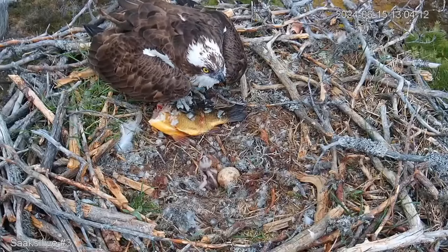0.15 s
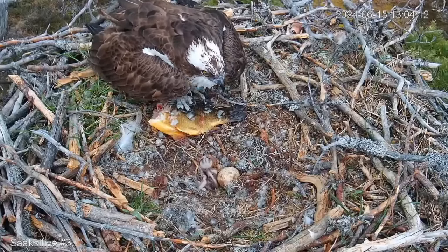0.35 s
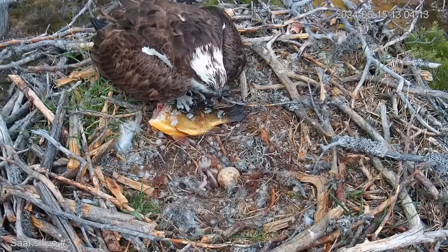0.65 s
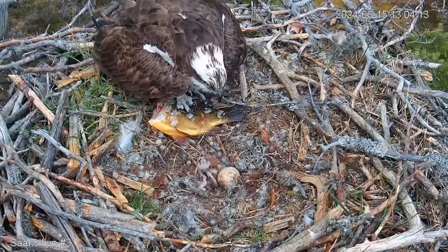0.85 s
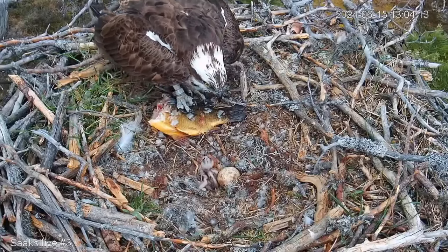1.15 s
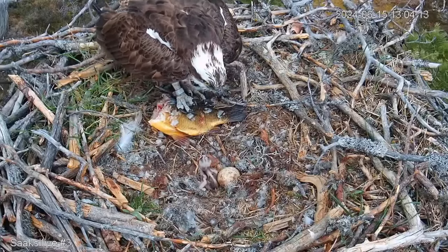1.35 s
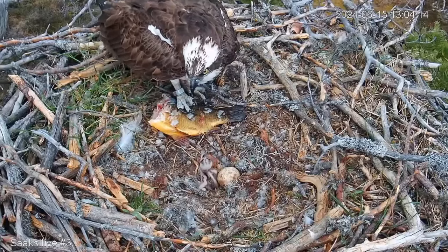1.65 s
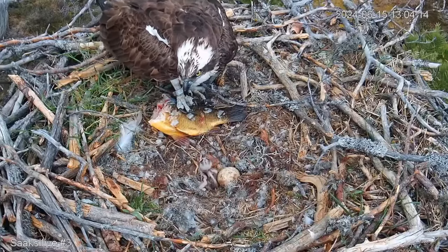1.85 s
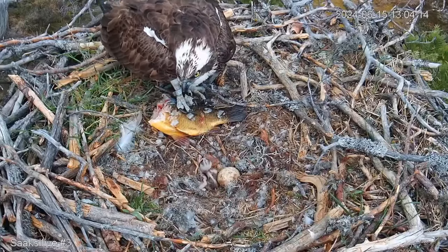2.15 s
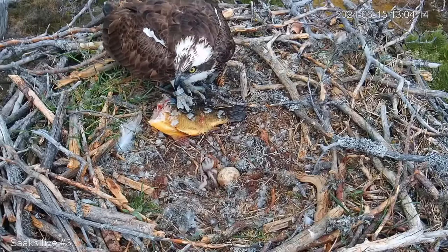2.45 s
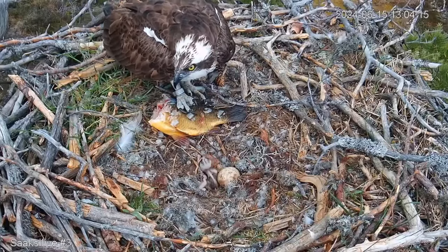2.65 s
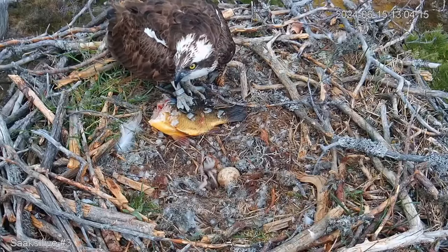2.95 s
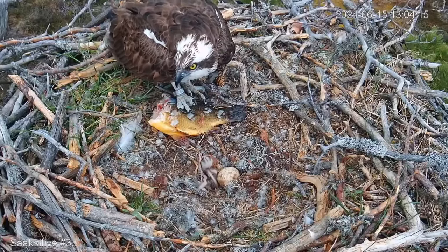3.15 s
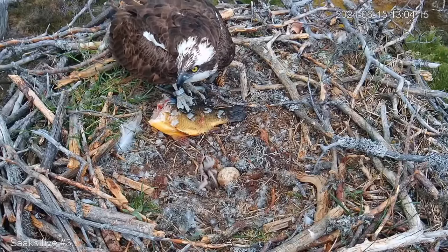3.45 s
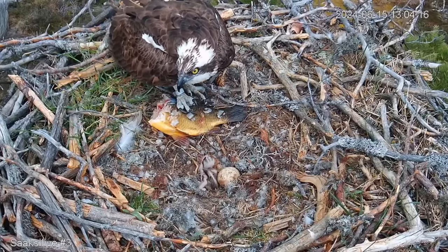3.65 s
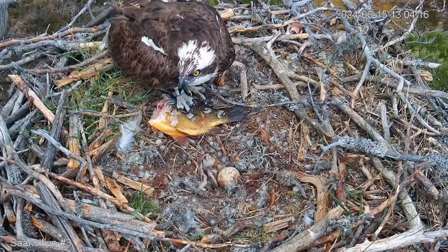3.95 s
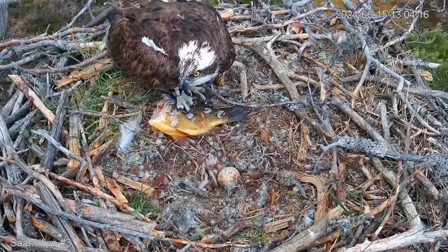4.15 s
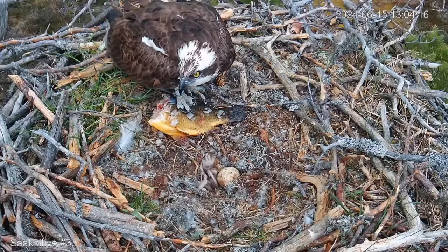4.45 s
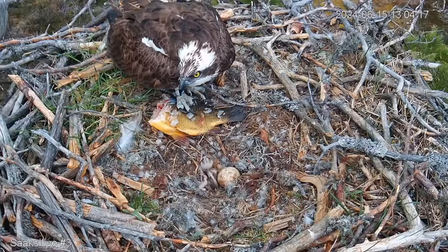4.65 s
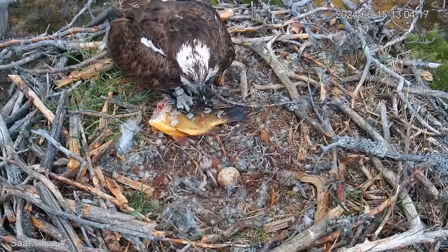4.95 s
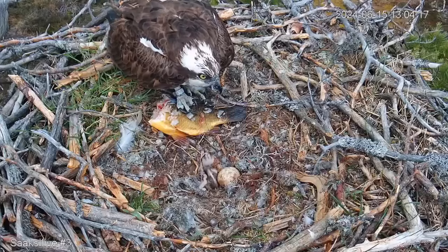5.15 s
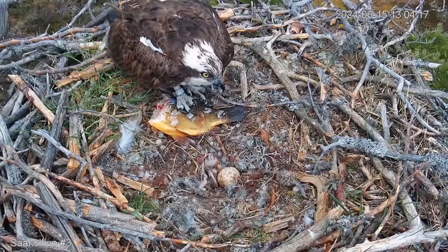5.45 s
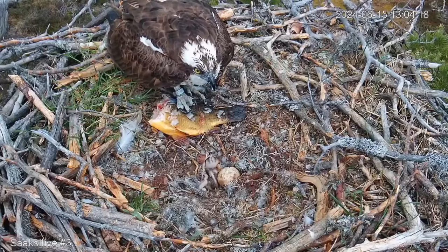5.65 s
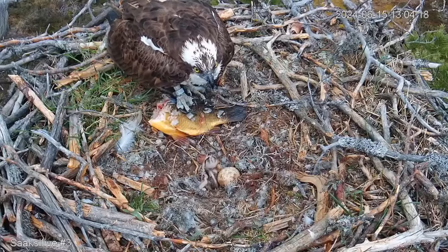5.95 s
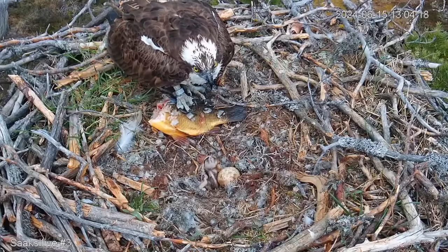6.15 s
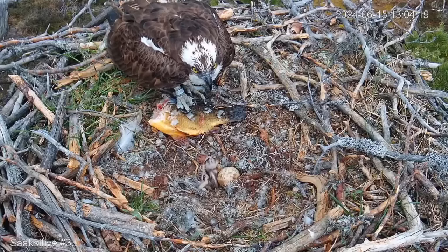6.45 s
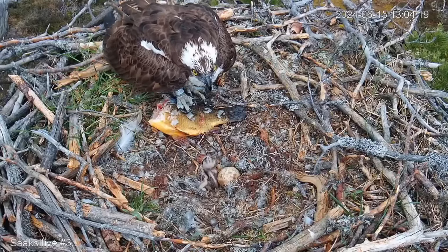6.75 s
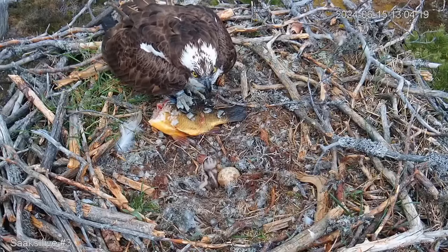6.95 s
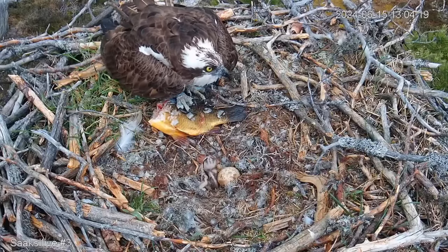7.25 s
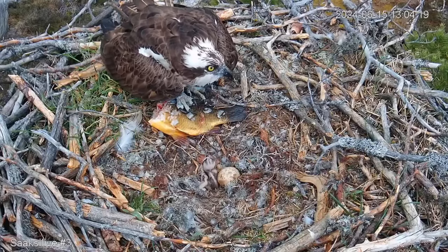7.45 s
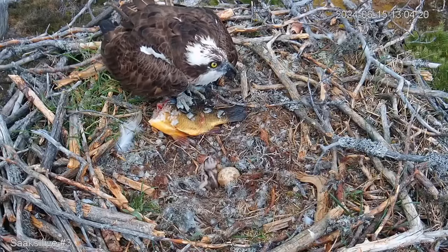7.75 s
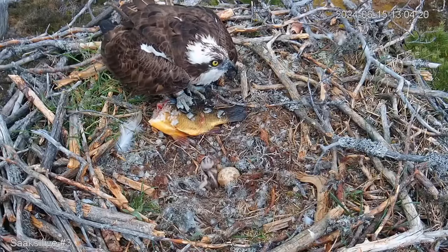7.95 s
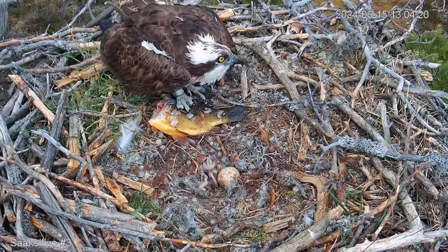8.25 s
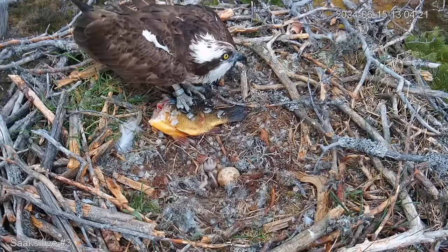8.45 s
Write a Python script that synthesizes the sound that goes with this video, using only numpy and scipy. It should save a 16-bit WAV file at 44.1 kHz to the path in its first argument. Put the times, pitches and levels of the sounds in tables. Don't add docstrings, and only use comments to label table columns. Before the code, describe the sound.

An osprey at its stick nest gives eight short, arched, partly raspy whistled calls over cracking twigs, faint far peeps, light wind and hiss.

```python
import sys
import numpy as np
from scipy import signal
from scipy.fft import rfft, irfft
from scipy.io import wavfile
from scipy.ndimage import uniform_filter1d

SR = 44100
rng = np.random.default_rng(int(sys.argv[2]) if len(sys.argv) > 2 else 0)


def dump_mix(stems):
    frames = np.atleast_2d(stems).T
    limited = np.clip(frames, -1, 1)
    pcm = np.round(limited * 32767).astype(np.int16)
    wavfile.write(sys.argv[1], SR, pcm)


def field_ratio(decibels):
    return 10 ** (np.asarray(decibels, dtype=float) / 20)


N = 378819

# (start [s], end [s], level [dB], drift to the end [dB], bare snap against ring [dB])
RASP_SPANS = [(0.0, 0.08, -38, 3, -6), (0.11, .168, -44, -9.5, -8.5), (0.227, 0.259, -36.5, 5, -8.5),
              (0.568, 0.789, -58.5, -7, 13), (1.268, 1.437, -52, -7, 5.5), (1.564, 1.597, -45, 1, -7),
              (1.91, 2.045, -39, -9.5, -11), (2.046, 2.087, -41, 3, -10), (2.247, 2.274, -42, 6, -20),
              (2.496, 2.636, -38, -4.5, -8.5), (2.792, 2.825, -38, 7, -13), (3.116, 3.306, -37.5, 1.5, -7),
              (3.381, 3.384, -43, 4, -12), (3.394, 3.43, -48, 4, -4), (3.44, 3.455, -41.5, 3, -26),
              (4.956, 5.206, -38.5, -12, -7.5), (5.676, 5.867, -38, -15, -10), (5.868, 5.891, -46.5, 1, -9),
              (5.974, 5.984, -54, 5, 0)]
# (rate at start [1/s], at end [1/s], unevenness [0-1], slip of the overtones [cycles])
SLAP_PACE = [(600, 650, .22, .075), (700, 700, .25, .1), (950, 950, .12, .07), (700, 750, .22, .125),
             (850, 650, .2, .1), (800, 800, .2, .07), (720, 600, .2, .065), (900, 1050, .1, .07),
             (900, 900, .15, .07), (800, 560, .2, .085), (800, 800, .2, .07), (800, 600, .2, .125),
             (800, 800, .2, .07), (950, 950, .15, .07), (800, 800, .2, .07), (620, 450, .15, .06),
             (850, 700, .2, .065), (860, 890, .06, .05), (800, 800, .2, .07)]
# (time [s], level [dB])
SQUEEZE_DB = [
    [(0.0, 0.5), (.03, -4), (.06, -9), (.092, -15.5), (.148, -8), (.204, 4.5), (.238, 2), (.269, 0)],
    [(.568, 5.5), (.6, -16), (.64, -16), (.7, -9), (.772, -11.5), (.798, -2.5), (.876, -1.5), (.911, -0.5)],
    [(1.269, 6), (1.311, -13), (1.35, -3), (1.411, -5), (1.461, -1), (1.529, -3), (1.58, 2.5),
     (1.606, -6.5)],
    [(1.911, -1), (1.971, 1.5), (2.01, -5.5), (2.045, -3), (2.095, -4.5), (2.173, 4.5), (2.211, 4),
     (2.275, -3)],
    [(2.496, -2.5), (2.55, 4.5), (2.62, -16), (2.654, -7.5), (2.726, -6), (2.764, 5), (2.81, 3)],
    [(3.117, -0.5), (3.209, -5), (3.243, -17), (3.29, -19), (3.31, -12), (3.347, -9), (3.389, -1),
     (3.44, 4)],
    [(4.957, 0), (5.0, -1), (5.06, -2.5), (5.16, -7.5), (5.223, -1), (5.285, -1), (5.33, 0), (5.35, -14),
     (5.374, -42)],
    [(5.677, 4), (5.707, 1), (5.785, -0.5), (5.883, -0.5), (5.953, 2), (5.999, 6.5), (6.018, 3.5)],
]


def colour(x, points, size=1024):
    hz, db = np.transpose(points)
    grid_hz = np.linspace(1, SR / 2, size + 1)
    cep = irfft(np.log(field_ratio(np.interp(np.log(grid_hz), np.log(hz), db))))
    cep[1:size] *= 2
    cep[size + 1:] = 0
    h = irfft(np.exp(rfft(cep)))[:size]
    return signal.fftconvolve(x, h / np.sqrt(np.sum(h ** 2)))[:len(x)]


def ring(x, hz, width_hz):
    return signal.lfilter(*signal.iirpeak(hz, hz / width_hz, SR), x)


def modes(x, table):
    click = np.arange(1024) == 0
    h = np.zeros(1024)
    for k, (hz, width_hz, db) in enumerate(table):
        h += (-1) ** k * field_ratio(db) * ring(click, hz, width_hz) / width_hz ** .5
    gain_db = 20 * np.log10(np.abs(rfft(h)) + 1e-5)
    return colour(x, np.transpose([np.linspace(1, SR / 2, 513), gain_db]))


def smooth(s, v, t):
    i = np.clip(np.searchsorted(s, t) - 1, 0, len(s) - 2)
    h, slope = np.diff(s)[i], np.gradient(v, s)
    u = np.clip((t - s[i]) / h, 0, 1)
    step = u * u * (3 - 2 * u) * (v[i + 1] - v[i])
    return v[i] + step + h * u * (1 - u) * ((1 - u) * slope[i] - u * slope[i + 1])


def gate(t, start, end, edge):
    return np.clip(np.minimum(t - start, end - t) / edge, 0, 1)


def arch(u, a, b, c):
    return a + (c - a) * u + (b - (a + c) / 2) * 4 * u * (1 - u)


def bumps(t, table):
    return sum(h * np.cos(np.pi / 2 * np.clip((t - s) / half, -1, 1)) ** 2 for s, half, h in table)


def walk(rate):
    k = int(SR / rate)
    held = np.repeat(rng.standard_normal(N // k + 1), k)
    return 1.3 * uniform_filter1d(uniform_filter1d(held, k), k)[:N]


def air(t):
    # (frequency [Hz], density [dB per Hz])
    hiss_colour = [(35, -73), (60, -32), (290, -19), (490, -12.5), (900, -5), (1400, -7), (2000, -2),
                   (3300, -3), (5300, -4.5), (8100, -4.5), (10300, -6), (11500, -11), (13700, -16.5)]
    # (frequency [Hz], density [dB per Hz])
    wind_colour = [(120, -42), (300, -19), (700, -7.5), (1200, -1), (2500, -2), (4500, -5.5), (9500, -6.5),
                   (12000, -22.5)]
    # (time [s], level [dB])
    gust_db = [
        (0.0, -68.5),
        (1.5, -75.5),
        (3.0, -67),
        (4.0, -64.5),
        (5.0, -68.5),
        (6.2, -63),
        (7.0, -63.5),
        (7.9, -65),
        (8.2, -62.5),
        (8.59, -57.5),
    ]
    hiss = field_ratio(-62.5 + .5 * walk(13)) * colour(rng.standard_normal(N), hiss_colour, size=2048)
    hiss += field_ratio(-86) * ring(rng.standard_normal(N), 40, 100)
    flicker_db = 1.2 * walk(25) + 1.5 * walk(300)
    wind = colour(rng.standard_normal(N) * field_ratio(flicker_db), wind_colour)
    return hiss + field_ratio(np.interp(t, *np.transpose(gust_db))) * wind


def peeps():
    # (time [s], length [s], level [dB], start pitch [Hz], end pitch [Hz])
    peep_notes = [(3.064, .043, -53, 5700, 5250), (7.428, .02, -66, 5400, 4900),
                  (7.553, .027, -59, 5100, 4500), (7.582, .012, -66, 5200, 6000),
                  (7.658, .022, -57, 4700, 4900), (7.687, .012, -64, 5200, 6000),
                  (7.766, .022, -57.5, 5150, 4700), (7.792, .012, -64, 5200, 6300),
                  (7.933, .058, -57.5, 5600, 4600), (8.098, .055, -56.5, 5600, 4650),
                  (8.258, .065, -58, 5600, 4650), (8.423, .042, -60, 5600, 4900)]
    low_hz, hook_hz = 5200, 5440
    out = np.zeros(N + SR)
    for s, length, db, first_hz, last_hz in peep_notes:
        middle_hz = hook_hz if first_hz < low_hz else (first_hz + last_hz) / 2
        u = np.linspace(0, 1, int(length * SR))
        cycles = np.cumsum(arch(u, first_hz, middle_hz, last_hz)) / SR
        note = field_ratio(db) * np.sin(np.pi * u) ** .5 * np.sin(2 * np.pi * cycles)
        note = note * field_ratio(2.5 * walk(250)[:len(u)])
        for lag_s, share in ((0, 1), (.004, .3), (.017, .1)):
            out[int((s + lag_s) * SR):][:len(u)] += share * note
    return out[:N]


def rustles(t):
    # (time [s], length [s], level [dB], ring [Hz])
    scrapes = [(1.222, 0.062, -65, 6000), (2.841, 0.022, -59, 4700), (2.994, 0.043, -62.5, 6700),
               (4.185, 0.024, -63, 5570), (4.565, 0.043, -61, 4500), (4.823, 0.023, -60.5, 4600),
               (6.188, 0.038, -62, 4400), (6.191, 0.036, -61, 5500), (6.274, 0.027, -60, 4600),
               (6.541, 0.014, -63, 3400), (6.802, 0.026, -63, 5200), (6.859, 0.025, -65, 4600),
               (7.144, 0.045, -61.5, 7400), (7.507, 0.022, -65, 4650), (7.525, .018, -62, 5600)]
    out = np.zeros(N)
    for s, length, db, low_hz in scrapes:
        on = slice(int(s * SR), int((s + length) * SR))
        grit = rng.standard_normal(SR // 8)[:len(t[on])] * field_ratio(4.0 * walk(500)[on])
        scrape = ring(ring(grit, low_hz, 900), low_hz, 900) + 0.51 * ring(grit, 8200, 1600)
        out[on] += field_ratio(db) * gate(t[on], s, s + length, 0.0025) * scrape / scrape.std()
    return out


def twigs():
    # (time [s], peak [dB], ring [Hz], ring against crack [dB])
    cracks = [(0.324, -32.5, 2340, -4), (0.3577, -48, 5500, -1), (0.4, -44, 6040, -11),
              (0.438, -44, 7240, 1), (0.472, -46, 7810, -3), (0.5498, -48, 7440, -3),
              (0.973, -38, 6560, -7), (3.674, -48, 7850, 0), (3.6964, -55, 5900, -3),
              (3.841, -47, 5960, -3), (3.8953, -47, 4900, -3), (3.933, -41, 4700, 1),
              (3.983, -44.5, 2090, -3), (4.409, -48, 2770, -3), (4.473, -41, 8700, 5),
              (4.571, -49, 4640, 1), (4.653, -47, 2100, -7), (5.533, -53, 6660, -3), (6.167, -44, 5280, 0),
              (6.276, -43.5, 4730, 9), (6.288, -49, 8000, 1), (6.293, -45, 4700, 1),
              (6.3563, -27.5, 7000, -7), (6.359, -36.5, 3600, 1), (6.3635, -42, 8000, -7),
              (6.457, -55, 9000, 1), (6.4764, -47.5, 8950, 6), (6.5418, -47, 6000, -6),
              (6.7288, -45, 3380, -2), (6.746, -42.5, 8000, -5), (6.764, -46, 6500, -6),
              (6.784, -29, 8300, -10), (6.7933, -42, 3700, -2), (6.7985, -45, 9000, -8),
              (6.8445, -47, 7900, -1), (6.871, -47, 4640, 2), (6.904, -48, 4700, 1),
              (7.0305, -45, 3300, -8), (7.883, -40.5, 4650, 3), (7.883, -45.5, 7600, 6),
              (7.89, -50, 7300, 3), (7.899, -49, 7300, 9), (8.3822, -44, 7460, -11)]
    out, t = np.zeros(N + SR), np.arange(SR // 8) / SR
    dull = signal.butter(2, 11500, fs=SR, output="sos")
    for s, db, hz, ring_db in cracks:
        t60_s = .018 * np.exp(.015 * (db + 56.0))
        grit = rng.standard_normal(len(t)) * field_ratio(1.7 * rng.standard_normal(len(t)))
        burst = grit * (field_ratio(-60 * t / (.2 * t60_s)) + .5 * field_ratio(-60 * t / t60_s))
        snap = ring(ring(burst, 6600, 7500), 6600, 7500) + .6 * ring(burst, 3400, 1200)
        snap = snap + 3.2 * field_ratio(ring_db) * ring(ring(burst, hz, 1100), hz, 1100)
        snap = snap + 0.054 * np.diff(burst, prepend=0) * field_ratio(-60 * t / 0.0037)
        snap = signal.sosfilt(dull, snap)
        out[int(s * SR):][:len(t)] += field_ratio(db) * snap / np.abs(snap).max()
    return out[:N]


def beating(t):
    # (start [s], end [s], beat at start [Hz], at end [Hz], depth [dB])
    beat_spans = [
        (5.221, 5.244, 330, 700, -3),
        (5.244, 5.263, 700, 930, -7),
        (5.263, 5.306, 930, 330, -12),
        (5.8937, 5.9172, 330, 320, -3),
        (5.9172, 5.9322, 320, 100, -3),
        (5.9322, 5.943, 60, 60, -6),
    ]
    # (1st partial [dB], 1st fade per step [0-1], 2nd fade [0-1], 3rd partial [dB])
    ladders = [(-1, .88, .6, -4), (1, .92, .68, -5), (4, .88, .55, -4), (-3, .88, .5, 2), (-3, .88, .5, 2),
               (-3, .85, .6, -3)]
    rate_hz, depth, fade = np.zeros(N), np.zeros((3, N)), np.zeros((3, N))
    for (start, end, first_hz, last_hz, db), ladder in zip(beat_spans, ladders):
        low_db, low_fade, mid_fade, top_db = ladder
        on = slice(int((start - .002) * SR), int(end * SR))
        middle_hz = (first_hz + last_hz) / 2 + 55
        rate_hz[on] = arch((t[on] - start) / (end - start), first_hz, middle_hz, last_hz)
        depth[:, on] = field_ratio(db + np.array([[low_db], [0], [top_db]]))
        fade[:, on] = np.clip([[low_fade], [mid_fade], [.4]], 0, .93)
    turns = np.cumsum(rate_hz * (1 + .015 * walk(150))) / SR
    turns = turns - np.maximum.accumulate(np.where(rate_hz == 0, turns, 0)) - .66
    depth, fade = uniform_filter1d(depth, size=100), uniform_filter1d(fade, size=100)
    return depth, fade, np.exp(2j * np.pi * turns)


def whistle(t):
    # (frequency [Hz], gain [dB])
    throat = [(1300, -17), (2000, -2), (2800, 0.05), (3300, -4.5), (3650, -10), (3900, -0.5), (4500, -1.5),
              (5300, 14), (5900, 12), (6600, 11), (7200, 7), (7700, 10), (9000, 9.5), (11500, -3)]
    # (pitch [Hz], 1st partial [dB], 2nd [dB], 3rd [dB])
    register = [(1410, -48.5, -53.5, -69.5), (2150, -51.5, -53, -60), (2410, -53.5, -51.5, -51.5),
                (2716, -48.5, -52, -52.5), (3210, -46.5, -56, -59), (3584, -42.5, -48, -52.5),
                (3700, -47, -46.5, -49.5), (3996, -39, -40.5, -52.5)]
    # (start [s], start pitch [Hz], end [s], end pitch [Hz])
    call_ends = [
        (0.0, 2682, .270, 1620),
        (.568, 1480, .911, 1450),
        (1.269, 1500, 1.606, 1760),
        (1.911, 1450, 2.285, 2180),
        (2.496, 1520, 2.83, 1530),
        (3.117, 1337, 3.466, 1584),
        (4.957, 1283, 5.374, 1650),
        (5.677, 2070, 6.018, 1540),
    ]
    # (time [s], pitch [Hz])
    glides = [
        [(.026, 2505), (.092, 3490), (.118, 3280), (.148, 3170), (.162, 3210), (.204, 3640), (.238, 2825)],
        [(.586, 2135), (.64, 2820), (.702, 2672), (.772, 3120), (.798, 3410), (.876, 3047), (.894, 2515)],
        [(1.311, 2897), (1.365, 2900), (1.411, 3015), (1.461, 3765), (1.491, 3660), (1.529, 3746),
         (1.591, 2455)],
        [(1.937, 2405), (1.971, 2870), (2.045, 2557), (2.095, 3480), (2.173, 3620), (2.211, 3892),
         (2.265, 2780)],
        [(2.51, 2100), (2.592, 3147), (2.654, 3530), (2.688, 3520), (2.726, 3583), (2.764, 3784), (2.81, 2554)],
        [(3.135, 2132), (3.209, 3000), (3.243, 2920), (3.305, 3350), (3.347, 3670), (3.389, 3230),
         (3.427, 2950)],
        [(4.987, 2200), (5.069, 2418), (5.147, 3106), (5.189, 3070), (5.223, 3450), (5.258, 3680),
         (5.318, 3480), (5.35, 2830)],
        [(5.707, 2586), (5.785, 2715), (5.831, 2950), (5.869, 3450), (5.883, 3540), (5.953, 3530),
         (5.999, 2503)],
    ]
    # (start [dB], middle [dB], end [dB], first push [dB])
    breath = [(-3, -1, 1, 1.1), (0.3, 0.5, 1, 3.8), (0, -1.5, 0, 6), (-1.8, 0, -0.5, 3.2), (1, 0, 3, 0.92),
              (-0.5, 0, 5, 2.4), (-1.3, -2.5, -7.5, 1.9), (1, -1.5, 6, 3.5)]
    beak_open_db = [-0.025, 0.65, 0.76, -1.7, -1.1, -0.8, -1.5, -0.29]
    # (start [s], end [s], rate [Hz], depth [0-1])
    stutters = [(1.512, 1.555, 1100, .45), (2.125, 2.158, 700, .3), (2.165, 2.235, 900, .1),
                (2.738, 2.782, 900, .12), (5.932, 5.945, 500, .4)]
    # (time [s], half width [s], level [dB])
    catches = [(.218, 0.0085, -2.5), (0.869, 0.0065, -12), (2.188, 0.01, 3.5), (2.207, 0.013, -1),
               (2.224, 0.0082, 5), (2.238, 0.0081, -2.5), (2.782, 0.0075, -13.5), (3.318, 0.0085, -12),
               (3.372, 0.0096, -15), (4.974, 0.0021, -6), (5.213, 0.0044, 10), (5.219, 0.0021, -20),
               (5.334, 0.0047, -8), (5.890, .003, 0), (5.9315, 0.0031, -10), (5.939, 0.0031, 5.5),
               (5.962, 0.024, -7), (5.995, 0.0052, -3)]
    # (time [s], half width [s], level [dB])
    wavers = [(.08, 0.013, 6), (.107, .01, 7), (.148, 0.018, -8), (.835, .03, -7), (.868, .008, 6),
              (1.49, 0.024, 4.5), (2.125, .025, 3), (2.6, 0.019, -6), (2.783, .01, 7), (3.315, .012, 9),
              (3.374, 0.01, 12), (3.4, 0.023, -4), (5.22, 0.036, -6), (5.31, 0.038, -8), (5.334, 0.0052, 3),
              (5.8, 0.08, 3), (5.89, 0.06, -6), (5.937, .005, -9)]
    # (time [s], half width [s], pitch shift [Hz])
    kinks = [(.19, .035, -70), (1.285, .018, 90), (1.57, .018, -60), (1.592, .01, 90), (2.105, .018, -50),
             (2.52, .012, 70), (2.55, .012, -90), (2.81, .014, 120), (3.14, .018, 60), (5.22, .007, 110),
             (5.29, .038, -160), (5.325, .015, 40)]
    push_at_s, push_width_s = 0.044, 0.036
    out, cycles = np.zeros(N), np.zeros(N)
    depth, fade, turn = beating(t)
    rasping = sum(gate(t, start, end, 0.0015) for start, end, *_ in RASP_SPANS)
    loss_db = -1.5 * sum(gate(t, start, end, 0.0052) for start, end, *_ in RASP_SPANS)
    register_hz, first_db, *overtone_db = np.transpose(register)
    throat_hz, throat_db = np.transpose(throat)
    stutter = np.ones(N)
    for start, end, hz, share in stutters:
        stutter += share * gate(t, start, end, 0.0054) * (np.tanh(walk(hz)) - .5)
    catch = field_ratio(sum(db * np.clip(1 - np.abs(t - s) / half, 0, 1) for s, half, db in catches))
    shaky_db, slip = 1.5 * rasping * np.tanh(walk(900)), np.tanh(walk(900))
    loose = sum(row[3] * gate(t, start, end, .003) for (start, end, *_), row in zip(RASP_SPANS, SLAP_PACE))
    calls = zip(call_ends, glides, breath, beak_open_db, SQUEEZE_DB)
    for ends, glide, (*breath_db, push_db), beak_db, grip in calls:
        s, hz = np.transpose([ends[:2], *glide, ends[2:]])
        on = slice(int(s[0] * SR), int(s[-1] * SR))
        pitch = smooth(s, hz, t[on]) + bumps(t[on], kinks)
        cycles[on] = np.cumsum(pitch) / SR
        squeeze = np.interp(t[on], *np.transpose(grip))
        push = push_db * np.exp(-((t[on] - s[0] - push_at_s) / push_width_s) ** 2)
        air_db = arch((t[on] - s[0]) / (s[-1] - s[0]), *breath_db) + push
        db = [np.interp(pitch, register_hz, first_db) + air_db + bumps(t[on], wavers)]
        db += [np.interp(pitch, register_hz, d) + squeeze for d in overtone_db]
        db[2] = db[2] + beak_db
        db += [db[2] - 4.5, db[2] - 8.5]
        for k, d in enumerate(db, 1):
            d = d + np.interp(np.log(k * pitch), np.log(throat_hz), throat_db)
            d = d - 7 * np.maximum(k * pitch / 1000 - 11.7, 0)
            d = d + (2.6 * shaky_db[on] + loss_db[on] if k > 1 else 1.6 * shaky_db[on])
            step = min(k, 3) - 1
            sidebands = depth[step, on] * turn[on] / (1 - fade[step, on] * turn[on])
            beat = (stutter[on] if k > 1 else 1) - sidebands
            slip_cycles = slip[on] * (loose[on] if k > 1 else .11 * rasping[on])
            phase = 2 * np.pi * k * (cycles[on] + slip_cycles)
            level = 2 ** .5 * field_ratio(d) * gate(t[on], s[0], s[-1], 0.00114)
            out[on] += level * np.imag(beat * np.exp(1j * phase))
    return out * catch, cycles


def rasp(t, cycles):
    # (frequency [Hz], width [Hz], level [dB])
    slap_modes = [(4500, 670, -10.5), (5114, 840, -7), (6010, 415, -1.5), (7420, 1070, -5),
                  (7570, 370, -1.5), (8500, 1050, -6), (10150, 170, -16), (10300, 1300, -27),
                  (12230, 2800, -15.5)]
    # (midway swell [dB], windpipe at start [dB], at end [dB], beak at start [dB], at end [dB])
    gapes = [(-1.6, 2, 8.5, 0.1, -6), (3.5, 2, 1, 0.1, -5), (-5.5, 2, -1, 0.1, 1),
             (0.3, -4.5, 10.5, 0.1, -8), (-0.6, 0, 11, 0.1, -2.5), (-7, -5, -2, 0.1, -3),
             (1.5, 1, 2, 0.1, 0.5), (.1, 6, 2, 1, -0.5), (-3, -8, -12, 0.1, 8.5), (-1.5, 0, 3.5, 1.1, 1.5),
             (-1.5, 9, 1, 0.1, -1), (-2, 8, 8.5, 0.1, -7), (2, 0.1, 0.1, 0.1, 2), (-4, 3, 6, 0.1, -3),
             (0, 1, 13, 0.1, -3), (-2.3, -5, 0, 1.3, 0), (-3.5, -3, 5, 0.1, -2), (0.5, 2, 2, 2, 2),
             (1, 2, 14, 0.1, -2)]
    taut_hz, slack_db_per_octave = 2770, -13
    lock_hz, lock_span_hz = 2150, 400
    slaps, snaps, pipe_db, beak_db = np.zeros((4, N))
    runs_db = 2.2 * np.tanh(walk(90))
    for span, (bow_db, *gape_db), (*pace, uneven, _) in zip(RASP_SPANS, gapes, SLAP_PACE):
        start, end, db, drift_db, snap_db = span
        chance = np.clip(rng.standard_normal((400, 3)).T, -2, 2)
        on = slice(int(start * SR), int(end * SR))
        pitch = np.clip(np.gradient(cycles[on]) * SR, 1000, 5000)
        rate = np.interp(t[on], (start, end), pace)
        rate = rate + (pitch - rate) * np.clip((lock_hz - pitch) / lock_span_hz, 0, 1)
        due = np.interp(np.cumsum(np.exp(uneven * chance[0])), np.cumsum(rate) / SR, t[on])
        cycle = np.round(np.interp(due, t[on], cycles[on]))
        wait = np.diff(cycle, prepend=cycle[0] - 2)
        kept = (wait > 0) & (due < t[on][-1])
        when = np.interp(cycle + .75 + .022 * chance[1], cycles[on], t[on])[kept]
        pitch = np.interp(when, t[on], pitch)
        u = (when - start) / (end - start)
        size = field_ratio(arch(u, db - drift_db / 2, db + bow_db, db + drift_db / 2))
        size = size * np.sqrt(SR * wait[kept] / pitch) * gate(when, start - .005, end + .003, .007)
        size = size * field_ratio(slack_db_per_octave * np.log2(taut_hz / np.minimum(pitch, taut_hz)))
        squeeze_db = 0.22 * np.interp(when, *np.concatenate(SQUEEZE_DB).T)
        size = size * field_ratio(squeeze_db + 1.1 * chance[2, kept] + np.interp(when, t, runs_db))
        for shift in range(-6, 7):
            at = (when * SR).astype(int) + shift
            offset = at - when * SR
            kernel = size * np.sinc(offset) * np.cos(np.pi * offset / 14)
            np.add.at(slaps, np.maximum(at, 0), kernel)
            np.add.at(snaps, np.maximum(at, 0), kernel * field_ratio(snap_db))
        on = slice(on.start, on.stop + 200)
        pipe_db[on] = np.interp(t[on], (start, end), gape_db[:2])
        beak_db[on] = np.interp(t[on], (start, end), gape_db[2:])
    snap_band = signal.butter(1, (1790, 11200), "band", fs=SR, output="sos")
    ringing = -modes(slaps, slap_modes) - 2 * signal.sosfiltfilt(snap_band, snaps)
    pipe, beak = ring(ringing, 5260, 880), ring(ringing, 4400, 2000)
    ringing = ringing + (field_ratio(pipe_db) - 1) * pipe + (field_ratio(beak_db) - 1) * beak
    ringing = signal.sosfiltfilt(signal.butter(4, 11600, fs=SR, output="sos"), ringing)
    ringing = ringing - .5 * ring(ringing, 3520, 1700)
    return signal.sosfiltfilt(signal.butter(2, 1200, "high", fs=SR, output="sos"), ringing)


def scene():
    t = np.arange(N) / SR
    tone, cycles = whistle(t)
    mono = air(t) + peeps() + rustles(t) + twigs() + tone + rasp(t, cycles)
    return np.array([mono, mono])


def top_cut(x):
    return signal.sosfilt(signal.butter(12, 13810, fs=SR, output="sos"), x)


def record(dry):
    # (start [s], end [s], level left [dB], step at the edges [dB])
    dropouts = [
        (0.6508, 0.663, -32.5, -56),
        (5.678, 5.6784, -8, -54),
    ]
    t = np.arange(N) / SR
    out = signal.sosfilt(signal.ellip(8, .2, 60, 13750, fs=SR, output="sos"), dry)
    for start, end, left_db, step_db in dropouts:
        out = out * (1 - (1 - field_ratio(left_db)) * gate(t, start, end, .0001))
        for edge in (start, end):
            out = out + field_ratio(step_db) * (t > edge) * np.exp(-np.abs(t - edge) / 0.00017)
    return top_cut(out)


dry = scene()
out = record(dry)
dump_mix(out)
```